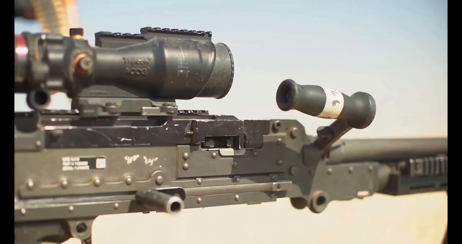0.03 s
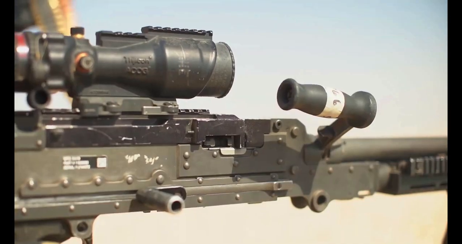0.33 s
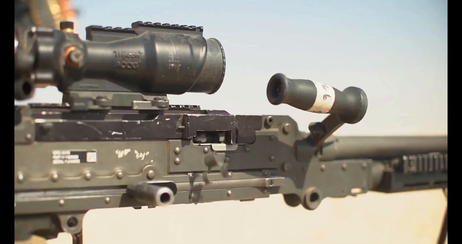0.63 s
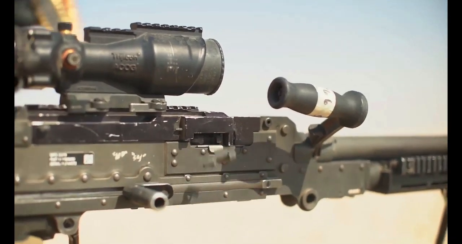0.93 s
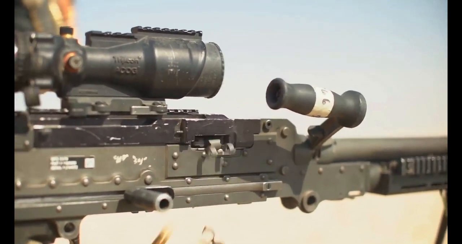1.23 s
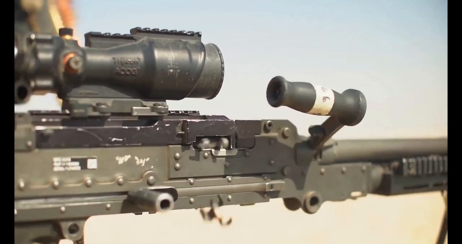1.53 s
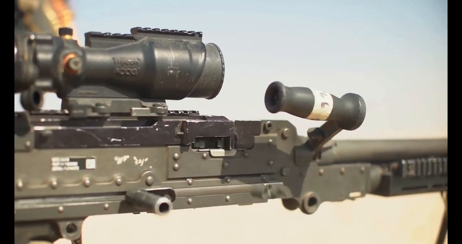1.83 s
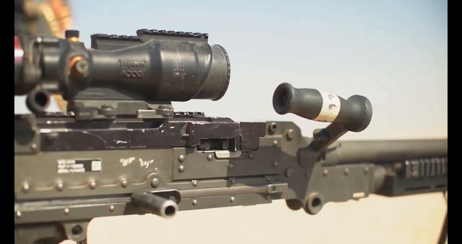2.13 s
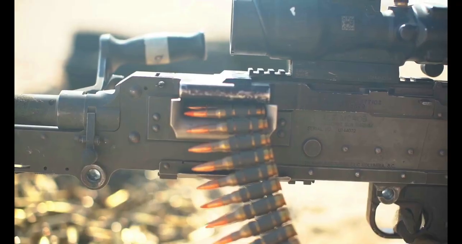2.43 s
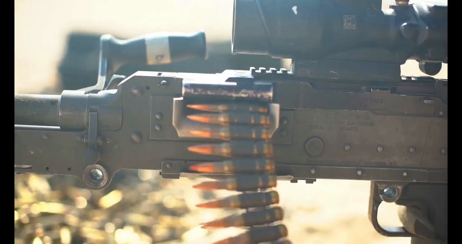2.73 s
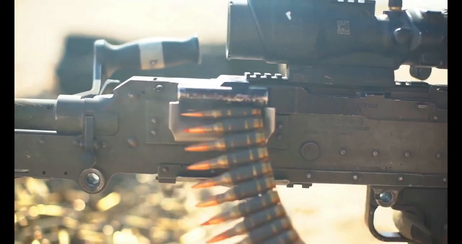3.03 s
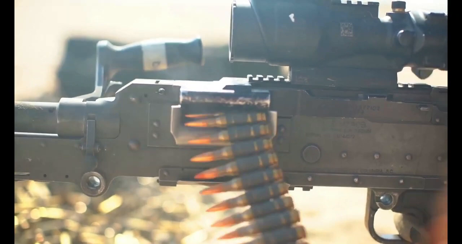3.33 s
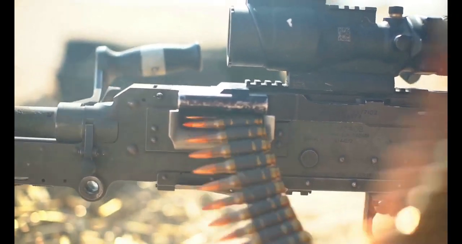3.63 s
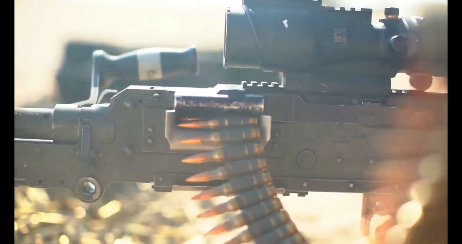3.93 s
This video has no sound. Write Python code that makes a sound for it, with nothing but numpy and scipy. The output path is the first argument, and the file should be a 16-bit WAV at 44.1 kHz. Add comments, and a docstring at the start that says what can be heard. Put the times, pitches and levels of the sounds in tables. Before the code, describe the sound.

A belt-fed machine gun fires a loud, rapid burst close to the microphone on an open range, its steel action clattering. Spent links and cases clink in the pause over faint wind, then a second burst follows.

```python
"""A belt-fed machine gun fires two bursts on an open range, with the microphone close up:
first on the ejection side, then on the feed side. Every round is a run of steel contacts in the
action and a muzzle blast that returns in the same echoes each time. Spent links and cases ring on
after a burst. Wind buffets the microphone at the first position; faint air lies under both."""
import sys
import numpy as np
from scipy import signal
from scipy.fft import rfft, irfft
from scipy.io import wavfile

SR = 44100
rng = np.random.default_rng(int(sys.argv[2]) if len(sys.argv) > 2 else 0)


def inscribe(sig):
    """Save sig as 16-bit PCM at rate SR to the path in sys.argv[1].

    A 1-D sig is mono; a 2-D sig holds one channel per row.
    Samples are clipped to [-1, 1] before scaling.
    """
    pcm = np.round(np.clip(np.atleast_2d(sig).T, -1, 1) * 32767)
    wavfile.write(sys.argv[1], SR, pcm.astype(np.int16))


N = 176400
T = np.arange(N) / SR
EJECTION_SIDE, FEED_SIDE = 0, 1   # microphone positions
MIC_MOVE_S = 2.346   # cut from the first position to the second


def from_db(db):
    """Decibels to gain."""
    return 10 ** (np.asarray(db) / 20)


def convolve(x, response):
    """Pass a signal through a response, keeping the length."""
    return signal.oaconvolve(np.atleast_2d(x), np.atleast_2d(response), axes=1)[:, :np.shape(x)[-1]]


def causal_filter(points, column=1, size=4096):
    """Minimum-phase response that follows a table of (frequency [Hz], level [dB])."""
    points = np.array(points, float)
    hz = np.maximum(np.arange(size // 2 + 1) * SR / size, 1)
    level_db = np.interp(np.log(hz), np.log(points[:, 0]), points[:, column])
    cepstrum = irfft(np.log(from_db(level_db)))
    fold = np.r_[1, np.full(size // 2 - 1, 2), 1, np.zeros(size // 2 - 1)]
    return irfft(np.exp(rfft(cepstrum * fold)))


def coloured(x, points, column=1):
    """Give a white signal a spectrum without changing its power."""
    response = causal_filter(points, column)
    return convolve(x, response / np.linalg.norm(response))


def drift(rate_hz, step=6):
    """Random wander with spread 1, drawn in steps of a few samples."""
    r = np.exp(-2 * np.pi * rate_hz * step / SR)
    wander = signal.lfilter([1], [1, -2 * r, r * r], rng.standard_normal((N + SR) // step))
    return np.repeat(wander / np.sqrt(np.mean(wander ** 2)), step)[-N:]


def ring(force, hz, t60):
    """A resonance: a unit click sets a sine of height 1 ringing."""
    r, w = from_db(-60 / (t60 * SR)), 2 * np.pi * hz / SR
    return signal.lfilter([.5, 0, -.5], [1, -2 * r * np.cos(w), r * r], force + 1e-18)


def fade(t, t60):
    """Full level until time zero, then an exponential decay."""
    return np.exp(-np.log(1000) * np.maximum(t, 0) / t60)


def clicks(rows, size=N):
    """One click for each (time [s], level [dB])."""
    out = np.zeros(size)
    for s, db in rows:
        out[int(np.clip(s * SR, 0, size - 1))] += from_db(db)
    return out


# Stereo width at the microphone: (frequency [Hz], side minus mid [dB])
WIDTH = [(30, -2), (120, -9.5), (300, -15), (700, -5.5), (1400, -4), (2500, 1), (15000, -1)]
def stereo_noise(size=N):
    """Noise in left and right: narrow in the bass, wide in the treble."""
    mid, side = rng.standard_normal((2, size))
    return (mid + convolve(side, causal_filter(WIDTH)) * [[1], [-1]]) / np.sqrt(2)


# Ambience of the open range: (frequency [Hz], relative level [dB])
AIR_SPECTRUM = [(18, -43.5), (30, -13), (597, 2.5), (1690, -12), (1830, -9.5), (2430, -11), (3590, -12),
                (8040, -14), (15000, -18)]
def still_air(gain_db=-85.5):
    """A faint, steady hush at both positions."""
    return from_db(gain_db) * coloured(stereo_noise(), AIR_SPECTRUM)


# Gusts on the microphone, ejection side, in two runs of (time [s], level [dB])
GUSTS = [
    [(0.0, -58), (0.012, -66), (0.048, -54.5), (0.156, -67), (0.176, -55), (0.21, -77), (0.282, -56.5),
     (0.342, -68), (0.352, -80), (0.412, -61), (0.432, -75), (0.458, -54), (0.586, -61), (0.6, -83)],
    [(2.2, -65), (2.226, -81), (2.252, -54), (2.3, -74), (2.312, -53), (2.324, -61), (2.34, -64)],
]
# Their rumble, right at the capsule: (frequency [Hz], relative level [dB])
WIND_SPECTRUM = [(25, -20), (80, -10), (170, 4), (380, 3.5), (700, -11), (1400, -29.5), (4000, -47),
                 (15000, -61)]
def wind(gain_db=-3.5, lump_db=3.5):
    """Wind buffets the microphone in low, uneven lumps."""
    gust_db = np.interp(T, *np.vstack(GUSTS).T)
    pressure = from_db(gain_db + gust_db + lump_db * drift(rate_hz=45))
    return coloured(stereo_noise() * pressure, WIND_SPECTRUM)


# Colour of steel contacts, close up: (frequency [Hz], ejection side [dB], feed side [dB])
STEEL_SPECTRUM = [(100, -36.5, -43), (400, -10, -22.5), (810, -10.5, -2.5), (1350, 3.5, 3), (2200, 0, 1),
                  (3300, -1.5, 2), (4100, -1.5, -0.5), (6000, -3.5, 0.5), (10800, -6.5, -4.5),
                  (13000, -9, -6.5), (15300, -10, -9.5)]
# Modes of the receiver, alike from both sides: (frequency [Hz], level [dB], t60 [s])
RECEIVER_MODES = [(1180, -13, 0.09), (1438, -11.5, .05), (1910, -10, .06), (2160, -11, 0.15),
                  (2540, -17, .045), (4246, -10.5, 0.0083), (5840, -20, .045), (8050, -17, 0.027),
                  (9600, -28, .035), (10680, -19, .03)]
def clatter(contacts, position, longest_t60=.08, chatter_db=1, mode_spread_db=1.5, pan_db=.95):
    """Each contact is a dying chatter of steel on steel that excites the receiver's modes unevenly."""
    power, t = np.zeros(N + SR), T[:SR // 5]
    for s, db, attack, t60 in contacts:
        start = int(s * SR)
        envelope = np.minimum(t / attack, 1) * fade(t - attack, min(t60, longest_t60))
        power[start:start + len(t)] += (from_db(db) * envelope) ** 2
    force = stereo_noise() * np.sqrt(power[:N]) * from_db(chatter_db * drift(rate_hz=460))
    receiver = 0
    for hz, db, t60 in RECEIVER_MODES:
        drive = force * from_db(db + mode_spread_db * drift(rate_hz=5.3))
        receiver += ring(drive, hz, t60) * 2 / np.sqrt(t60 * SR)
    return (coloured(force, STEEL_SPECTRUM, 1 + position) + receiver) * from_db([[-pan_db], [pan_db]])


# Loose links landing or shifting by the gun, and at 1.924 s the bolt catching on the sear after the last round:
# (time [s], click [dB], click t60 [s], ring [dB])
CLINKS = [(.382, -77, .05, -112), (1.924, -39, .03, -60), (2.0171, -49, .035, -70), (2.0734, -54, .08, -58),
          (2.115, -68, .07, -73), (2.16, -70, .08, -80), (2.4077, -75, .03, -115),
          (2.5269, -57, .022, -105), (2.6377, -76, .03, -115)]
# Ring of links and cases: (frequency [Hz], ejection side [dB], feed side [dB], t60 [s])
BRASS_MODES = [(2030, -11, -20, .3), (3257, -7, -14, .3), (4000, 0, -12, .24), (5060, -7, -16, .27),
               (5700, -3, -2, .27), (7110, -4, -5, .27), (8349, -7, -14, .3), (9080, -2, -14, .25),
               (9520, -22, 3, .25), (10760, -2, -7, .33), (12420, 2, -16, .3), (12580, -20, 0, .25),
               (13980, -11, -14, .5), (14430, -6, 4, .25)]
def brass(shots, position, eject_s=.062, eject_db=-52, attack_s=.0008, beat_hz=17, spread_db=2):
    """Links and cases ring as they are thrown out and land; each tone is a close pair that beats."""
    clinks = [row for row in CLINKS if (row[0] > MIC_MOVE_S) == position]
    thrown = [(s + eject_s, db + eject_db) for s, db in shots]
    landed = [(s, ring_db) for s, _, _, ring_db in clinks]
    times, levels = np.array(thrown + landed).T
    out = clatter([(s, db, attack_s, t60) for s, db, t60, _ in clinks], position)
    for hz, *side_db, t60 in BRASS_MODES:
        for detune in (-beat_hz / 2, beat_hz / 2):
            strikes = np.zeros((2, N))
            for channel in strikes:
                onsets = times + rng.random(len(times)) / hz   # random phase
                channel += clicks(zip(onsets, levels + rng.normal(0, spread_db, len(times))))
            out += from_db(side_db[position]) * ring(strikes, hz + detune, t60) / np.sqrt(2)
    return out


# One cycle of the action, close up. Bolt starts forward, belt is pulled on, round leaves its link,
# round slides into the chamber, extractor snaps over the rim, bolt locks, ignition jolts the receiver,
# gas drives the piston, bolt runs back, cover and feed tray rattle:
# (time from ignition [s], ejection side [dB], feed side [dB], attack [s], t60 before the cap [s])
ACTION_CYCLE = [(-.076, -41.5, -36.5, .002, .07), (-.059, -36, -35.5, .002, 0.11),
                (-.041, -40, -36, .003, 0.095), (-.030, -32.5, -31.5, .007, 0.2),
                (-.019, -34, -29, .004, 0.1), (-.009, -22, -22.5, .0012, 0.061),
                (-.0005, -17.5, -19, .001, 0.074), (.002, -26.5, -26, .003, .06),
                (0.022, -33.5, -33.5, .009, .075), (.042, -58.5, -38.5, .005, .06)]
def action(shots, position, jitter_s=.00091, spread_db=1.5):
    """The same cycle of steel contacts for each round, a little different every time."""
    contacts = []
    for shot_s, shot_db in shots:
        for offset_s, *side_db, attack, t60 in ACTION_CYCLE:
            s = shot_s + offset_s + rng.normal(0, jitter_s)
            db = shot_db + side_db[position] + rng.normal(0, spread_db)
            contacts.append((s, db, attack, t60))
    return clatter(contacts, position)


# Echoes reaching the microphone: (time after ignition [s], level [dB], microphone position)
ECHOES = [(.004, -10.5, 0), (.008, -0.5, 0), (.012, -5.5, 0), (0.018, -2.5, 0), (.030, -14, 0),
          (0.045, -2, 0), (0.051, -7, 0), (0.0583, -1, 0), (0.068, -8.5, 0), (.082, -10, 0),
          (.0015, -4.5, 1), (.011, -2.5, 1), (.020, -4.5, 1), (.027, -5, 1), (0.0349, -3.5, 1),
          (.0395, -8.5, 0), (.044, -7.5, 1), (.052, -5, 1), (.060, -2.5, 1), (0.0703, -5, 1),
          (.080, -11.5, 1)]
# Colour of the blast, close up: (frequency [Hz], ejection side [dB], feed side [dB])
BLAST_SPECTRUM = [(30.2, -30.5, -25), (95, -28.5, -32), (162, -20, -10.5), (242, 5, 6), (420, 5.5, 7),
                  (697, 9.5, 12.5), (1200, 4, -6), (2230, -9, 0.5), (5000, -25, -11.5), (15000, -43.5, -52)]
# Scatter from the ground nearby: (frequency [Hz], ejection side [dB], feed side [dB])
GROUND_SPECTRUM = [(59.8, -35.5, -40), (108.8, -25.5, -20), (250, -19.5, -25), (700, 0, 11),
                   (1500, 2, 14.5), (3000, -5, 3.5), (7000, -14, -2), (15000, -34, -34)]
# Tail from far out on the range: (frequency [Hz], relative level [dB])
TAIL_SPECTRUM = [(40, -28), (90, -17), (170, -6), (350, 0), (800, -2), (2000, -13), (4000, -28),
                 (15000, -48)]
# Low resonances around the gun: (frequency [Hz], level [dB], t60 [s], microphone position)
BOOM_MODES = [(272, -11.5, 0.074, 0), (310, -7.5, 0.096, 0), (419.4, 7, 0.14, 0), (604, 3, 0.21, 0),
              (665, 5, 0.04, 0), (784, 0, 0.4, 0), (839, -10, 0.072, 0), (978, 3, 0.15, 0),
              (155.3, -18, 0.75, 1), (227, -3, 0.096, 1), (278, -9, 0.068, 1), (470.5, -2, 0.17, 1),
              (573, -5, 0.42, 1), (682, -4, 0.15, 1), (796, -16, 0.13, 1), (1100, -14, 0.095, 1)]
def muzzle_blast(shots, position, echo_db=-8, ground_db=-35, tail_db=-41, boom_db=-44):
    """Each blast meets the same surroundings: echoes, low resonances, ground scatter, a far tail."""
    ground_hold_s, boom_delay_s, scatter_gain = .066, .00996, .91
    t = T[:SR]
    arrivals = clicks([(s, db) for s, db, where in ECHOES if where == position], size=SR)
    smear = fade(t, t60=.02) ** 2   # each echo trails a short puff of noise
    scatter = stereo_noise(SR) * np.sqrt(np.abs(convolve(arrivals ** 2, smear / smear.sum())))
    echoes = coloured(arrivals / np.sqrt(2) + scatter_gain * scatter, BLAST_SPECTRUM, 1 + position)
    ground = coloured(stereo_noise(SR) * fade(t - ground_hold_s, t60=.08), GROUND_SPECTRUM, 1 + position)
    tail = coloured(stereo_noise(SR) * fade(t, t60=.82), TAIL_SPECTRUM)
    push = clicks([(boom_delay_s, boom_db)], size=SR)
    boom = sum((-1) ** k * from_db(db) * ring(push, hz, t60)
               for k, (hz, db, t60, where) in enumerate(BOOM_MODES) if where == position)
    report = from_db(echo_db) * echoes + boom + from_db(ground_db) * ground + from_db(tail_db) * tail
    return convolve(clicks(shots), report)


# Rounds fired beside the microphone: (time [s], level [dB], microphone position)
SHOTS = [(0.684, 1, 0), (0.7913, -0.53, 0), (0.8978, -0.29, 0), (1.0038, -0.44, 0), (1.1111, -0.15, 0),
         (1.2178, 0, 0), (1.3247, -0.71, 0), (1.4306, -0.5, 0), (1.5348, -0.75, 0), (1.6414, -0.6, 0),
         (1.7467, -1.3, 0), (1.8539, -1.26, 0), (2.7928, 1, 1), (2.9013, -0.31, 1), (3.0062, 0.064, 1),
         (3.1118, 0.054, 1), (3.2202, -0.93, 1), (3.3281, -0.52, 1), (3.4351, -0.13, 1), (3.5412, -0.3, 1),
         (3.6479, 0, 1), (3.7564, -0.93, 1), (3.861, 0.24, 1)]
def burst(position):
    """One burst with its falling brass, from one microphone position."""
    shots = [(s, db) for s, db, where in SHOTS if where == position]
    return action(shots, position) + muzzle_blast(shots, position) + brass(shots, position)


def scene():
    """The windy ejection side, then the sheltered feed side, over still air."""
    windy_side = (burst(EJECTION_SIDE) + wind()) * (T < MIC_MOVE_S)
    return windy_side + burst(FEED_SIDE) + still_air()


def record(dry):
    """Overload rounds the highest peaks, and the top treble is cut steeply."""
    ceiling, cutoff_hz = .35, 15250
    rounded = ceiling * np.tanh(dry / ceiling)
    lowpass = signal.firwin(161, cutoff_hz, fs=SR, window=("kaiser", 8))
    return signal.fftconvolve(rounded, lowpass[None], "same", axes=1)


dry = scene()
out = record(dry)
inscribe(out)
```